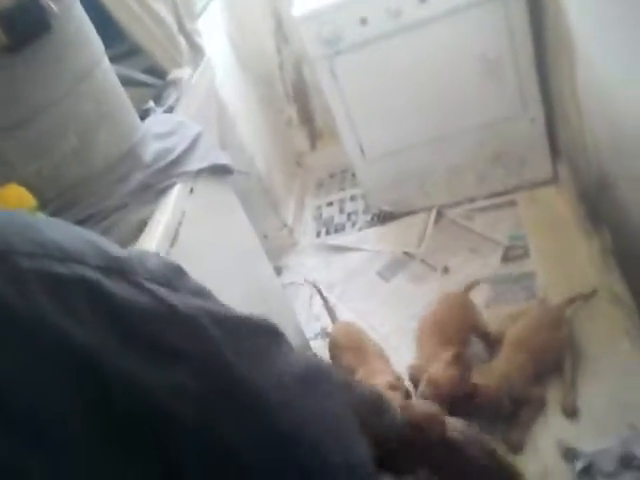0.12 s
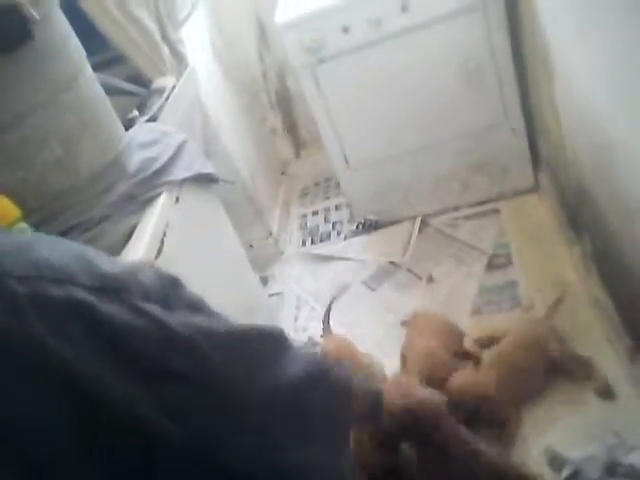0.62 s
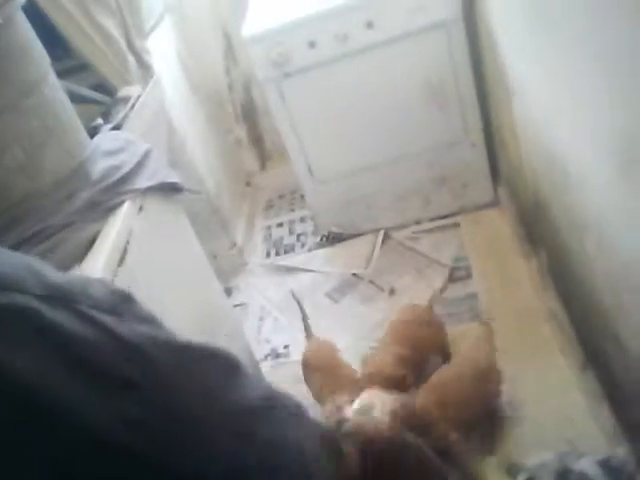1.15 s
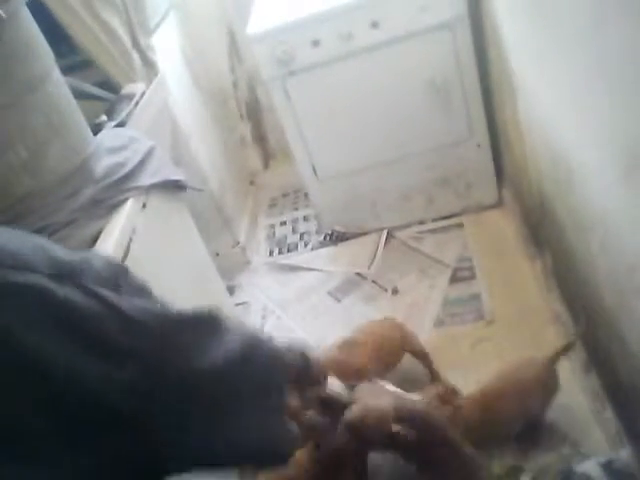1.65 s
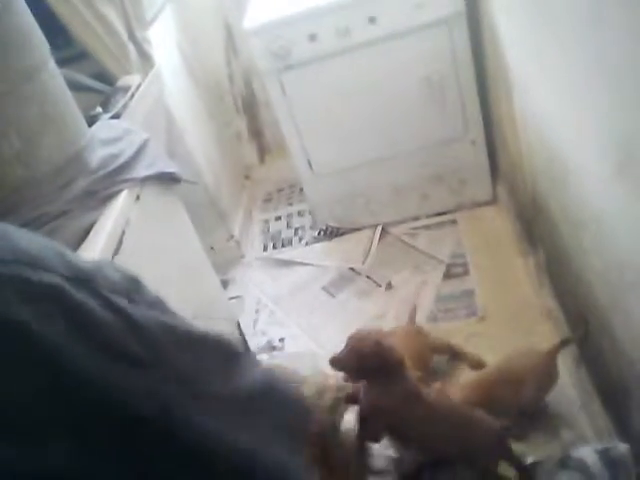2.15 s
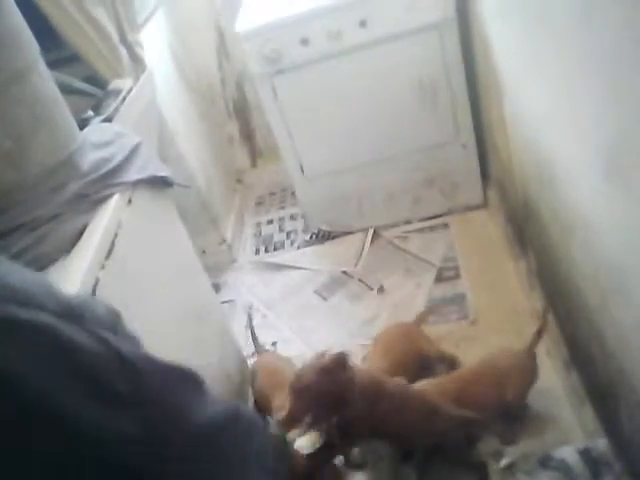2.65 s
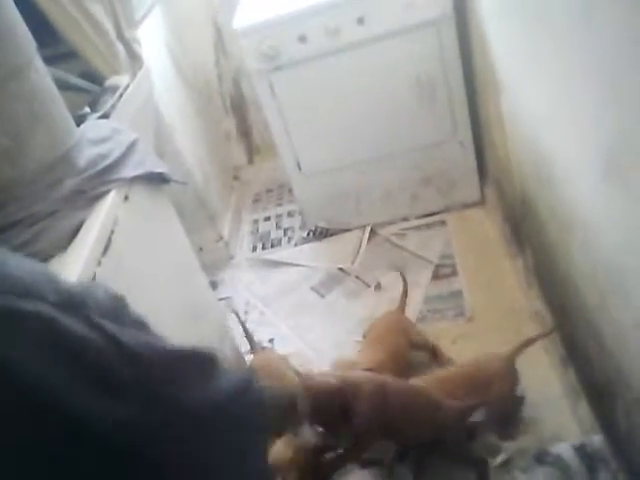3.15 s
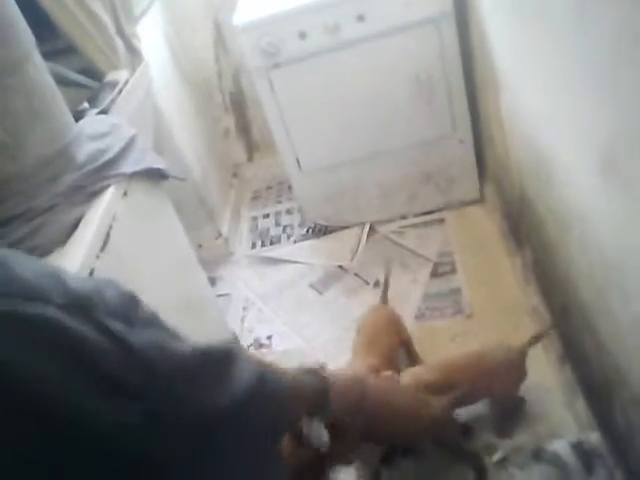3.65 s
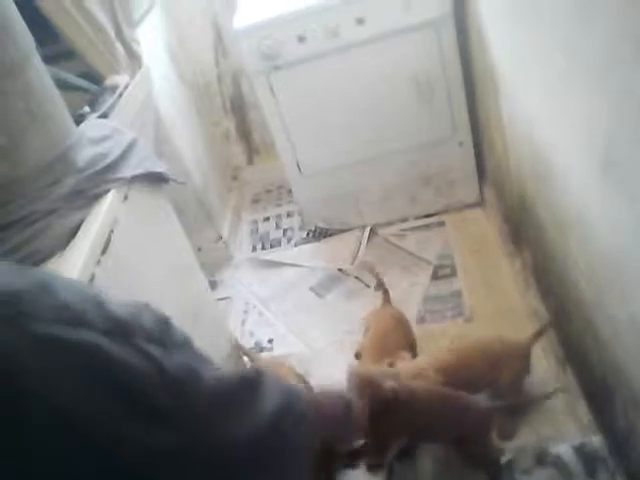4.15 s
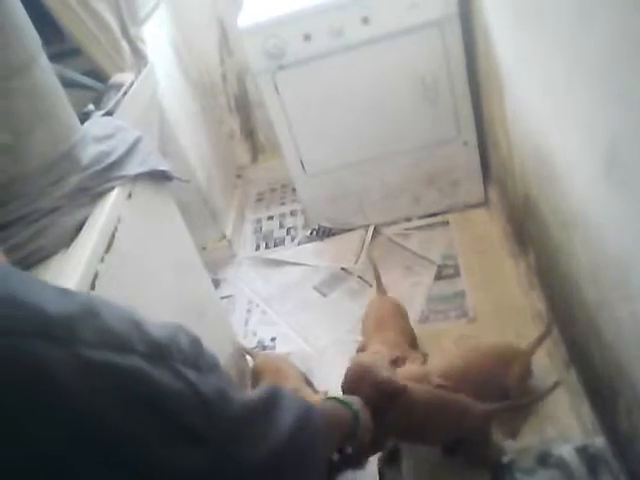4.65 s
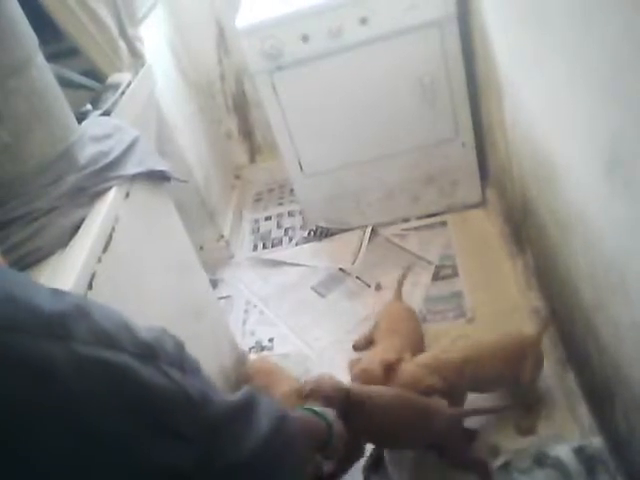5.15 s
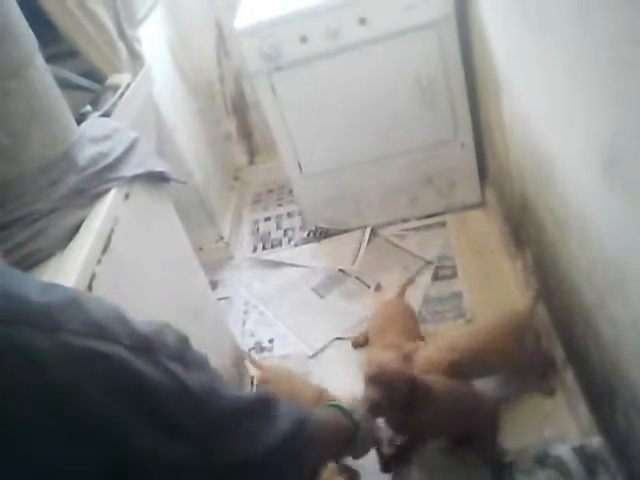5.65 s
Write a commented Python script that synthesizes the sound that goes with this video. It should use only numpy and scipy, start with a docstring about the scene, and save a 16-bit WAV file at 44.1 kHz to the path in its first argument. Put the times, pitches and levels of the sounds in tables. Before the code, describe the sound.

Several young puppies growl low and rough in play, breaking into short yips and a rising yowl, close up in a small hard room.

```python
"""A low puppy growl opens, close to a microphone in a small hard room; yips, yelps and a yowl rise from the play.
Growls: uneven slaps of slack folds and puffs of air ring in chest, pharynx and mouth.
Yips and yowl: taut folds give a harmonic stack, shaped by the moving jaw; the nose adds a fuzzy whistle.
Around them, bursts of treble hiss and crackle, some with the barks, come from filtered noise and clicks;
paws thump as decaying low sines; filtered noise makes floor rumble and room air. High peaks are clipped flat."""
import sys
import numpy as np
from scipy import signal
from scipy.fft import rfft, irfft
from scipy.io import wavfile
from scipy.ndimage import uniform_filter1d

SR = 44100
rng = np.random.default_rng(int(sys.argv[2]) if len(sys.argv) > 2 else 0)


def materialize(psi):
    """Save the field psi as 16-bit PCM at rate SR to the path in sys.argv[1].

    A 1-D psi becomes a single channel; in a 2-D psi each row is a channel.
    """
    bounded = np.clip(np.atleast_2d(psi).T, -1, 1)
    quanta = np.round(bounded * 32767).astype(np.int16)
    wavfile.write(sys.argv[1], SR, quanta)


def natural_amplitude(level_db):
    """Convert a level in decibels to a linear amplitude factor, elementwise."""
    exponent = np.asarray(level_db, float) / 20
    return 10 ** exponent


N = 255339  # length in samples


def evened(x):
    """Scales to rms 1."""
    return x / np.sqrt(np.mean(x ** 2) + 1e-20)


def add(mix, start_s, sound):
    """Mixes a sound into the track in place, cutting what runs past the end."""
    part = mix[round(start_s * SR):][:len(sound)]
    part += sound[:len(part)]


def unroll(rows):
    """Start time and the other columns of a breakpoint table, drawn as one value a sample."""
    times_s, *columns = np.transpose(rows)
    t = np.arange(times_s[0], times_s[-1], 1 / SR)
    return times_s[0], [np.interp(t, times_s, column) for column in columns]


def wander(length, ms):
    """Random drift of rms 1 that changes over about ms."""
    window = int(ms * SR / 1000) + 1
    return evened(uniform_filter1d(rng.standard_normal(length), window))


def coloured(x, points):
    """Filters x by a spectrum of (pitch_hz, level_db) and scales it to rms 1."""
    point_hz, point_db = np.transpose(points)
    hz = np.fft.rfftfreq(len(x), 1 / SR)
    gain_db = np.interp(np.log(hz + 1), np.log(point_hz + 1), point_db)
    return evened(irfft(rfft(x) * natural_amplitude(gain_db), len(x)))


def resonate(x, hz, width, order=2):
    """A moving resonance: shifts the curve hz down to zero, smooths, and shifts back."""
    carrier = np.exp(2j * np.pi * np.cumsum(hz * np.ones(len(x))) / SR)
    pole = np.exp(-np.pi * width / SR)
    low = x / carrier + 1e-18
    for _ in range(order):
        low = signal.lfilter([1 - pole], [1, -pole], low)
    return 2 * (carrier * low).real


def ring(drive, hz, width, db, shifting_db, order):
    """One resonance; tongue and head keep moving, so it swells and fades on its own."""
    swell = natural_amplitude(db + shifting_db * wander(len(drive), ms=49.0))
    return swell * resonate(drive, hz, width, order=order)


def peak_db(t, peak_s, db, rise, fall, hold_s=0):
    """A level that climbs to db at peak_s, holds, and falls, in dB a second."""
    climb = rise * np.maximum(peak_s - t, 0)
    decay = fall * np.maximum(t - peak_s - hold_s, 0)
    return db - climb - decay


def room_air():
    """Faint steady noise, weighted to the bass."""
    # spectrum of the air: pitch_hz, level_db (per Hz, relative)
    air_spectrum = [(18, -17), (30, -2.5), (330, -5.5), (770, -14), (2400, -19), (5900, -40),
                    (15000, -48.5)]
    return natural_amplitude(-61) * coloured(rng.standard_normal(N), air_spectrum)


def floor_rumble(pups):
    """Low noise carried through floor and hand; it follows the tussle that shakes the floor."""
    rms = np.sqrt(abs(uniform_filter1d(pups ** 2, 8000)))
    activity = rms ** .5  # swells half as far in dB as the play
    rumble = coloured(rng.standard_normal(N), [(25, -18.5), (45, -14.5), (95, 11.5), (400, -83.5)])
    return natural_amplitude(-45.5) * activity * rumble


def thump(db, hz, t60_s=0.11):
    """A soft low push on the floor: a sine that fades in as its level decays."""
    t = np.arange(SR // 4) / SR
    attack = np.minimum(t / 0.033, 1)
    return natural_amplitude(db - 60 * t / t60_s) * attack * np.sin(2 * np.pi * hz * t)


def paw_thumps():
    """Paws landing on the floor, each a short low thump."""
    # landings: start_s, level_db (before attack and decay), pitch_hz
    landings = [(1.369, -18, 72.7), (1.767, -10.5, 86), (2.149, -27.5, 87.5), (3.5, -4, 96),
                (5.721, -15.5, 104)]
    floor = np.zeros(N)
    for start_s, db, hz in landings:
        add(floor, start_s, thump(db, hz))
    return floor


def treble_bursts(crackles_per_s=900, spread_db=2.5):
    """Bursts of treble hiss and crackle, some with the barks; the hiss swells in patches of pitch."""
    # spectrum of the bursts: pitch_hz, level_db (per Hz, relative)
    burst_spectrum = [(1760, -12), (3000, -15), (3700, -12), (5180, -14), (7150, -17), (8750, -17),
                      (15000, -41)]
    # bursts of hiss and crackle: peak_s, peak_db, initial_fall_db_per_s
    bursts = [(0.0, -51.5, 33), (0.347, -45, 3), (0.718, -41.5, 20.5), (1.089, -40.5, 30.5),
              (1.323, -20.5, 149.5), (1.636, -33, 43.5), (1.92, -48, 29), (2.321, -29.5, 172.5),
              (2.65, -40, 39), (2.856, -40.5, 149.5), (3.18, -48, 115.5), (3.33, -41, 28.5),
              (3.69, -47, 156), (4.482, -52.5, 104), (5.299, -43.5, 23), (5.509, -24, 125.5),
              (5.78, -40, 66)]
    rise_db_per_s, quickening_db_per_s2 = 492, 54.5
    crackle_sizes = natural_amplitude(spread_db * np.minimum(rng.exponential(1, N), 4))
    crackles = (rng.random(N) < crackles_per_s / SR) * crackle_sizes
    z = signal.stft(.5 * evened(crackles) + rng.standard_normal(N), nperseg=512)[2]
    patches = uniform_filter1d(rng.standard_normal(z.shape), size=50, axis=0)
    patches = evened(uniform_filter1d(patches, size=5, axis=1))
    hiss = signal.istft(z * natural_amplitude(3.0 * patches), nperseg=512)[1][:N]
    t = np.arange(N) / SR
    level = np.zeros(N)
    for peak_s, db, fall in bursts:
        # each burst dies ever faster
        faster_fall = fall + quickening_db_per_s2 * np.maximum(t - peak_s, 0)
        level += natural_amplitude(peak_db(t, peak_s, db, rise_db_per_s, faster_fall))
    return level * coloured(hiss, burst_spectrum)


def nose():
    """Air whistling in the nose: noise through one high resonance gives a fuzzy whistle."""
    # whistles: peak_s, peak_db, hold_s
    whistles = [(1.308, -35, .015), (3.174, -35.5, 0.0055), (4.039, -44.5, 0.015), (5.049, -40, 0.0076),
                (5.298, -41.5, 0.17)]
    rise_db_per_s, fall_db_per_s = 587, 230
    t = np.arange(N) / SR
    level = sum(natural_amplitude(peak_db(t, peak_s, db, rise_db_per_s, fall_db_per_s, hold_s))
                for peak_s, db, hold_s in whistles)
    return level * evened(resonate(rng.standard_normal(N), hz=9210, width=1200))


def throat(drive, airy, shape, top, mouth_hz, upper_hz, shifting_db):
    """The pharynx, the mouth peak that moves with the jaw, and the upper resonances, each at rms 1."""
    back = resonate(drive, hz=640, width=200)
    low = sum(ring(drive, ratio * mouth_hz, width, db, shifting_db, order=3) for ratio, width, db in shape)
    high = sum(ring(airy, ratio * upper_hz, width, db, shifting_db, order=3) for ratio, width, db in top)
    return evened(back), evened(low), evened(high)


def growl(rows, hum, held, uneven_db=0.5, breath=1.43):
    """Slack folds slap at uneven times and sizes, each slap with a puff of air."""
    # mouth resonances, jaw half shut: ratio_to_mouth_hz, width_hz, level_db (relative)
    half_shut_mouth = [(0.89, 330, 35.5), (1.14, 440, 39), (1.5, 620, 25)]
    # broad upper resonances: ratio_to_upper_hz, width_hz, level_db (relative)
    broad_top = [(0.8, 498, 18), (1.01, 534, 21), (1.272, 647, 16.5)]
    usual_db, usual_mouth_hz = -20, 1000
    pharynx_follows, bright_follows, third_follows = 0.54, 1.26, .6  # dB per dB of effort
    pharynx_db_per_hz = 0.0331  # the pharynx stands out as the mouth peak sinks
    spent_db = -41  # below this effort the hum dies with the breath
    jaw_shift, tongue_shift = .035, .09  # rms drift of mouth and upper resonances, as a share

    start_s, (effort_db, mouth_hz) = unroll(rows)
    n = len(effort_db)
    push_db = effort_db - usual_db
    hum_s, hum_db, fold_hz = np.transpose(hum)
    t = start_s + np.arange(n) / SR
    chest_db = np.interp(t, hum_s, hum_db) + np.minimum(effort_db - spent_db, 0)
    rate_hz = np.interp(t, hum_s, fold_hz)
    pharynx_db, brightness_db, upper_hz, third_db = held
    back_db = pharynx_db + pharynx_follows * push_db - pharynx_db_per_hz * (mouth_hz - usual_mouth_hz)
    bright_db = brightness_db + bright_follows * push_db

    turns = np.cumsum(rate_hz * np.exp(.26 * wander(n, ms=7.0))) / SR
    size = natural_amplitude(uneven_db * rng.standard_normal(2000))[turns.astype(int) % 2000]
    slaps = size * np.diff(np.floor(turns), prepend=0) / np.sqrt(rate_hz)
    puffs = size * np.exp(-(turns % 1) / .5) * rng.standard_normal(n)
    drive = evened(slaps) + breath * evened(puffs)

    chest = resonate(drive, rate_hz * (1 + 0.11 * wander(n, ms=40.0)), 78)
    chest = chest + 0.44 * resonate(drive, 343.5, 75)
    chest = evened(signal.lfilter(*signal.butter(2, 95, "high", fs=SR), chest))  # a small chest has no deep bass
    trembling_mouth_hz = mouth_hz * (1 + jaw_shift * wander(n, ms=60.0))
    drifting_upper_hz = upper_hz * (1 + tongue_shift * wander(n, ms=90.0))
    back, low, high = throat(drive, drive, half_shut_mouth, broad_top,
                             trembling_mouth_hz, drifting_upper_hz, shifting_db=1.6)
    third = evened(ring(drive, 3220, 850, 0, shifting_db=2.0, order=3))
    voice = natural_amplitude(effort_db) * low + natural_amplitude(bright_db) * high + natural_amplitude(chest_db) * chest + natural_amplitude(back_db) * back
    voice = voice + natural_amplitude(third_db + third_follows * push_db) * third
    return start_s, voice * signal.windows.tukey(n, 500 / n)


def taut(hz, shape, mouth_hz, upper_hz, back_db, flutter, rasp):
    """Taut folds: a harmonic stack whose overtones swell and fray; puffs of air roughen the top."""
    # resonances that an open mouth lets out: ratio_to_upper_hz, width_hz, level_db (relative)
    open_top = [(0.777, 484.5, 13.5), (0.999, 560, 26), (1.2, 640, 18.5), (1.45, 783, 9.5),
                (1.901, 1133, -21)]
    n = len(hz)
    turns = np.cumsum(hz * (1 + flutter * wander(n, ms=4.1))) / SR
    folds = sum(natural_amplitude(1.5 * wander(n, ms=15.0)) * np.cos(2 * np.pi * k * turns) for k in range(2, 16))
    folds = evened(folds * natural_amplitude(1.5 * wander(n, ms=12.0)))
    puffs = np.exp(-(turns % 1) / .5) * rng.standard_normal(n)
    puffs = evened(signal.lfilter(*signal.butter(2, 4500, fs=SR), puffs))
    drive = folds + .3 * rasp * puffs
    airy = folds + rasp * puffs
    back, low, high = throat(drive, airy, shape, open_top, mouth_hz, upper_hz, shifting_db=.6)
    edge = signal.windows.tukey(n, 1200 / n)
    return (low + natural_amplitude(back_db) * back) * edge, high * edge


def yip(row, flutter, top, rasp):
    """A short call: pitch glides, the jaw follows it, and the bright top dulls."""
    # mouth resonances, jaw wide: ratio_to_mouth_hz, width_hz, level_db (relative)
    wide_mouth = [(0.999, 250, 5.5), (1.266, 350, -1.5), (1.6, 540, -7)]
    jaw_follows = 1.8  # mouth peak goes as pitch to this power
    attack_s, fade_db, dulls_db = 0.045, -2.5, -21.5  # fade and loss of brightness over the whole yip
    top_sinks = .1  # share of its pitch that the top loses over the yip

    start_s, length_s, effort_db, from_hz, to_hz, mouth_hz, back_db = row
    upper_hz, bright_db, top_attack_s = top
    t = np.arange(0, length_s, 1 / SR)
    progress = t / length_s
    hz = from_hz * (to_hz / from_hz) ** progress
    moving_mouth_hz = mouth_hz * (hz / from_hz) ** jaw_follows
    sinking_upper_hz = upper_hz * (1 - top_sinks * progress)
    body, high = taut(hz, wide_mouth, moving_mouth_hz, sinking_upper_hz, back_db, flutter, rasp)
    body = np.minimum(t / attack_s, 1) * body
    high = np.minimum(t / top_attack_s, 1) * natural_amplitude(bright_db + dulls_db * progress) * high
    return start_s, natural_amplitude(effort_db + fade_db * progress) * (body + high)


def yowl():
    """One long yip that climbs into a yowl; strain makes it brighter, rougher and higher in the throat."""
    # course of the call: time_s, pitch_hz, effort_db, mouth_hz
    course = [(5.23, 224.4, -16.5, 1166), (5.292, 221.5, -10.5, 1097), (5.366, 224, -13.5, 1100),
              (5.454, 284.2, -4.5, 1235), (5.492, 344, -8.5, 1377), (5.518, 359.5, -9.5, 1272),
              (5.564, 339, -10.5, 1219), (5.594, 357.6, -16.5, 1147), (5.67, 270, -30, 1052)]
    # mouth resonances, jaw at its widest: ratio_to_mouth_hz, width_hz, level_db (relative)
    widest_mouth = [(.82, 255, -4), (1.0, 199.5, 8), (1.15, 302, 0.5), (1.421, 401, -4)]
    start_s, (hz, effort_db, mouth_hz) = unroll(course)
    strain = np.maximum(np.log2(hz / 220), 0)  # octaves above an easy pitch in Hz
    lift_db = 9 * strain
    flutter = .006 + .014 * strain  # rms share of pitch
    rasp = .15 + 1.5 * strain  # puffs re folds
    upper_hz = 2144 + 300 * strain
    body, high = taut(hz, widest_mouth, mouth_hz, upper_hz, -15.5 + lift_db, flutter, rasp)
    return start_s, natural_amplitude(effort_db) * (body + natural_amplitude(-13 + lift_db) * high)


def room(x, t60_s=.2):
    """Dense short tail off close hard walls: sparse noise taps that decay."""
    t = np.arange(SR // 2) / SR
    taps = rng.standard_normal(len(t)) * (rng.random(len(t)) < .05)
    tail = taps * natural_amplitude(-60 * t / t60_s) * (t > .004)
    return signal.fftconvolve(x, tail / np.linalg.norm(tail))[:N]


def scene():
    """Voices, treble bursts and paws, with a room tail on voices and bursts, over faint room air."""
    # effort and jaw, one curve a breath: time_s, effort_db, mouth_hz
    growls = [
        [(0.0, -34.5, 1070), (0.048, -50, 935), (0.116, -34.5, 934), (0.356, -27.5, 974), (0.412, -38, 1000),
         (0.49, -23, 1030), (0.562, -25, 1124), (0.77, -26.5, 952), (1.08, -31, 840), (1.17, -41, 613),
         (1.27, -69, 572)],
        [(1.27, -39, 1100), (1.294, -14, 1016), (1.386, -14.5, 973), (1.5, -13, 830), (1.6, -14.5, 902),
         (1.78, -18.5, 1095), (1.862, -20, 800), (1.934, -17.5, 795), (2.114, -19.5, 915.6),
         (2.23, -43.5, 1014)],
        [(2.19, -42.5, 990), (2.285, -22.5, 1084), (2.316, -7.5, 1285), (2.428, -16.5, 900), (2.5, -23.5, 910),
         (2.6, -13, 950), (2.73, -10.5, 935), (2.868, -25.5, 932), (2.998, -25, 1030), (3.09, -63, 1010)],
        [(3.09, -56, 990), (3.118, -21.5, 915), (3.17, -6.5, 1006), (3.28, -16.5, 978), (3.33, -11, 996),
         (3.594, -16.5, 962), (3.74, -31, 915), (3.84, -55, 976)],
        [(3.924, -51, 960), (3.932, -31, 923), (4.066, -12.5, 1183), (4.156, -24, 918), (4.33, -22.5, 940),
         (4.5, -23, 1000), (4.614, -36.5, 970), (4.67, -99.5, 999)],
        [(4.83, -48, 954), (4.876, -35, 996), (4.89, -24.5, 1007), (4.99, -22.5, 917), (5.054, -13.5, 1013),
         (5.226, -18.5, 1000), (5.264, -16.5, 1073), (5.53, -9, 1128), (5.59, -7.5, 1085), (5.69, -17, 968),
         (5.79, -17, 1000)],
    ]
    # the hum in the chest, one curve a breath: time_s, level_db, fold_rate_hz
    chests = [
        [(0.0, -38, 136.2), (0.304, -34, 158.7), (0.36, -40.5, 143.1), (0.812, -30, 146.2), (1.05, -35, 208.6),
         (1.27, -62, 183.4)],
        [(1.27, -40, 243.4), (1.32, -52, 257), (1.446, -27.5, 207.1), (2.056, -30.5, 230.1),
         (2.23, -31.5, 213.8)],
        [(2.23, -33, 148.3), (2.524, -28, 153.5), (2.61, -22.5, 231.5), (2.704, -25.5, 191), (2.79, -26, 215.5),
         (3.09, -48.5, 191.7)],
        [(3.09, -49.5, 133.1), (3.108, -31.5, 140.8), (3.48, -25.5, 250.2), (3.59, -23, 237.4),
         (3.632, -28, 174.8), (3.84, -56, 164.9)],
        [(3.92, -34, 236.4), (4.0, -32.5, 210.9), (4.07, -27, 140.2), (4.408, -27.5, 164.7),
         (4.468, -24.5, 140.9), (4.67, -39.5, 147.7)],
        [(4.82, -64.5, 260.8), (4.898, -28, 225.1), (5.362, -26, 200.3), (5.53, -38.5, 175.5),
         (5.698, -26, 267.5), (5.79, -29.5, 215)],
    ]
    # how each breath is held at usual effort: pharynx_db, brightness_db, upper_hz, third_resonance_db
    throats = [(-35.5, -38, 2040, -48.5), (-31, -32, 2006, -44), (-47, -39, 2133, -45),
               (-41, -35.5, 2146, -45.5), (-43, -35, 2017, -45), (-42, -37.5, 2174, -46.5)]
    # yips: start_s, length_s, effort_db, start_pitch_hz, end_pitch_hz, start_mouth_hz, pharynx_db (re effort)
    yips = [(0.448, 0.069, -19, 222.4, 223.7, 1132, -15), (1.277, 0.15, -7.5, 353.2, 346.7, 1060, -5),
            (1.466, 0.077, -15.5, 350, 360, 997, 5), (1.868, 0.15, -14.5, 348.7, 392, 740, -10.5),
            (2.29, 0.17, -8.5, 337.3, 285.1, 1299, -17), (3.13, .12, -12.5, 335.6, 317, 1027, -18),
            (4.007, 0.12, -10, 223.1, 209.9, 1118, -17.5), (5.004, 0.13, -9.5, 224.4, 220.6, 1144, -19)]
    # hoarseness of each yip: pitch_flutter (rms share)
    flutters = [.01, .016, .03, .028, .028, .035, .007, .011]
    # the top of each yip: start_upper_hz, start_brightness_db (re effort), attack_s
    yip_tops = [(2170, -9.5, .025), (2713, 1.5, 0.014), (2070, -2.5, 0.035), (2270, 1.5, 0.058),
                (2412, 3, 0.042), (2353, 2.5, 0.04), (2160, -2, 0.037), (2190, -2, 0.049)]
    # air in the top of each yip: rasp (ratio of puffs to folds)
    rasps = [.5, 1.3, 1.5, 1.3, 1.4, 1.2, .35, .3]

    pups = treble_bursts() + nose()
    for breath in zip(growls, chests, throats):
        add(pups, *growl(*breath))
    for call in zip(yips, flutters, yip_tops, rasps):
        add(pups, *yip(*call))
    add(pups, *yowl())
    floor = paw_thumps() + floor_rumble(pups)
    return (pups + natural_amplitude(-8) * room(pups) + floor + room_air())[None]


def roll_off(x):
    """The treble ends steeply here."""
    return signal.sosfilt(signal.butter(12, 15600, fs=SR, output="sos"), x)


def record(dry):
    """Thins the deep bass, clips peaks at the ceiling, dulls them in the converter and limits the band."""
    ceiling = .99
    thin = signal.lfilter(*signal.butter(1, 22, "high", fs=SR), dry)
    clipped = np.clip(thin, -ceiling, ceiling)
    dulled = signal.lfilter(*signal.butter(1, 7100, fs=SR), clipped)
    band_limit = signal.firwin(511, 15600, window=("kaiser", 9), fs=SR)
    finished = signal.oaconvolve(dulled, band_limit[None], "same")
    return roll_off(finished)


dry = scene()
out = record(dry)
materialize(out)
```